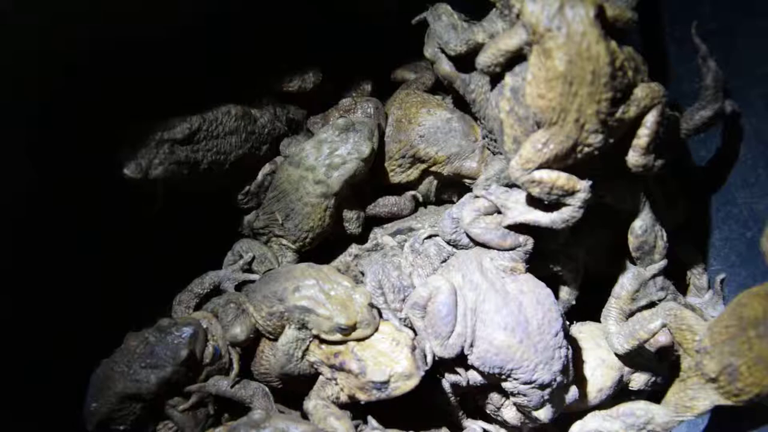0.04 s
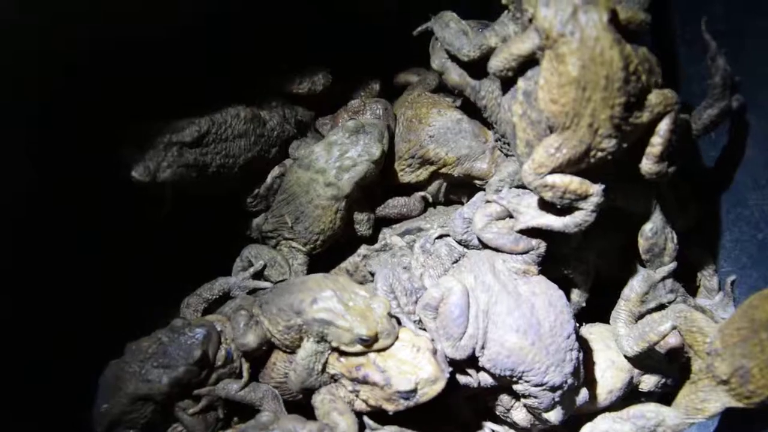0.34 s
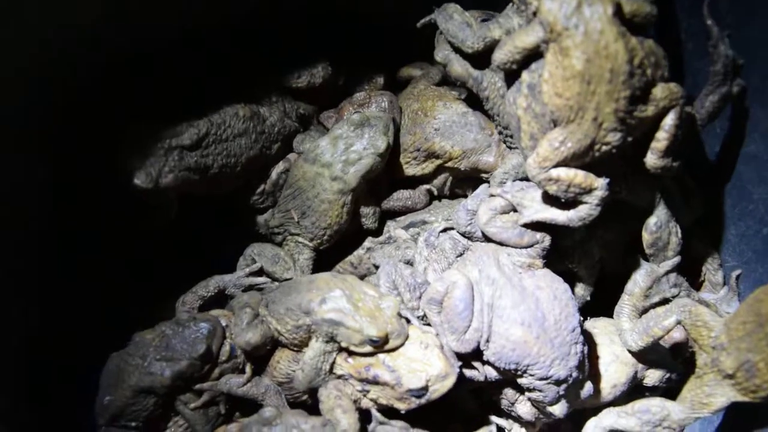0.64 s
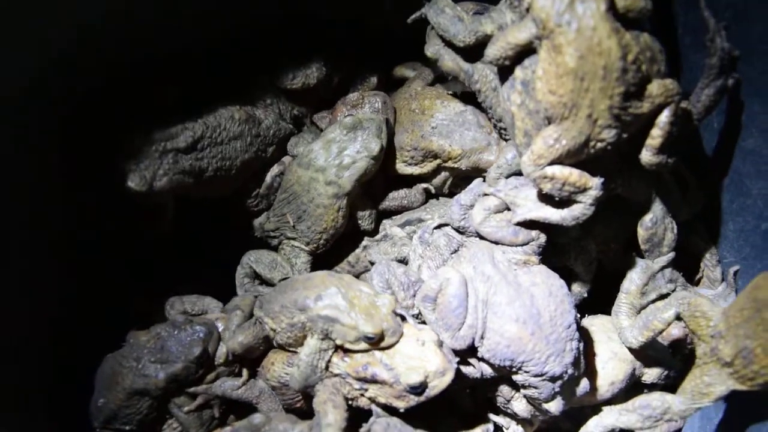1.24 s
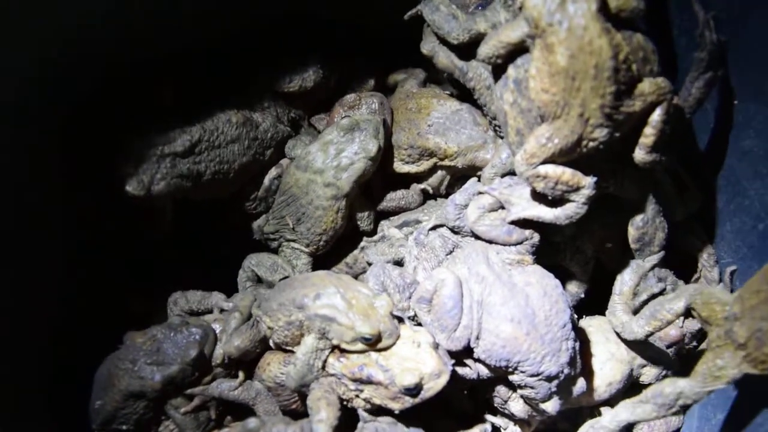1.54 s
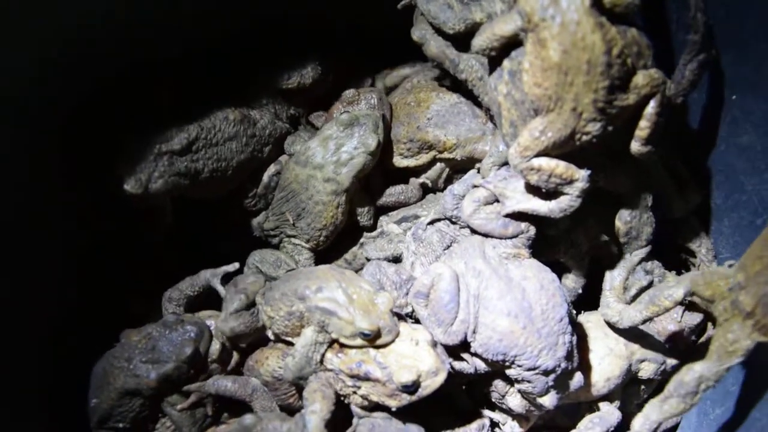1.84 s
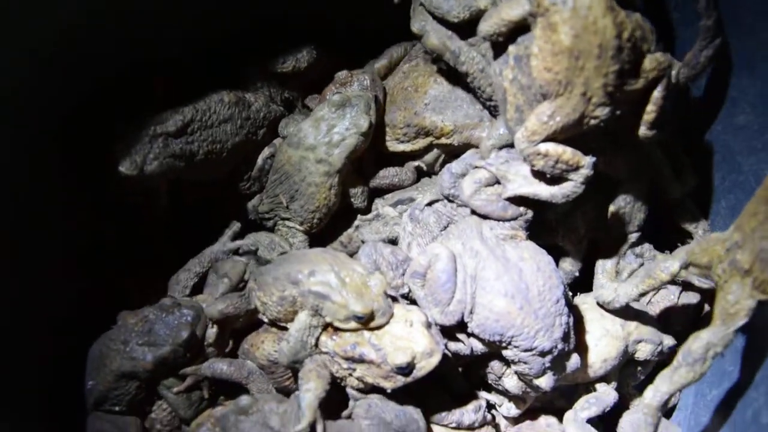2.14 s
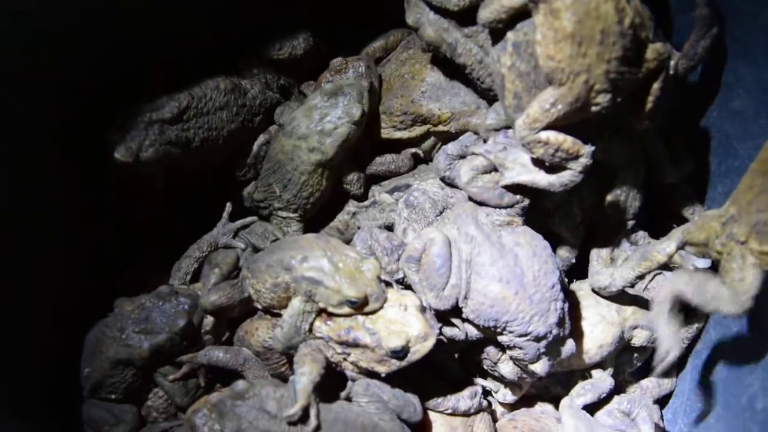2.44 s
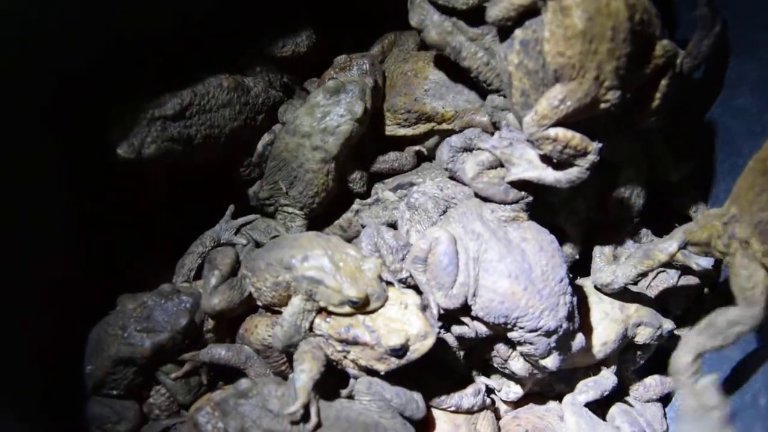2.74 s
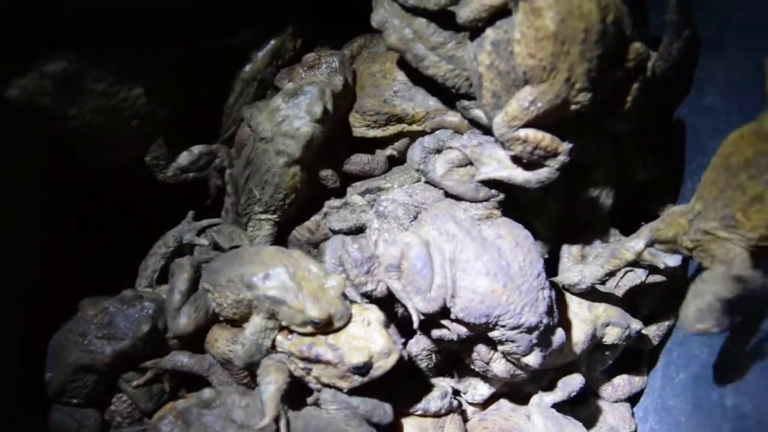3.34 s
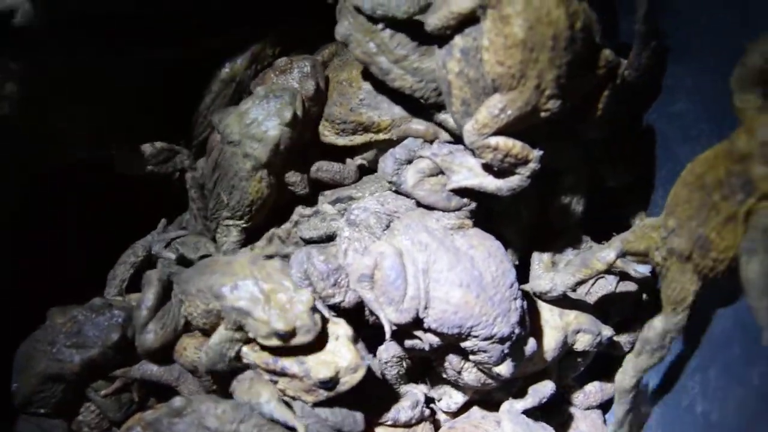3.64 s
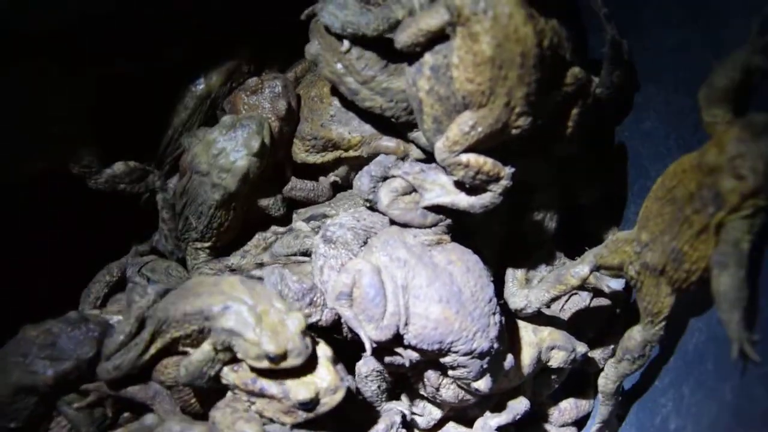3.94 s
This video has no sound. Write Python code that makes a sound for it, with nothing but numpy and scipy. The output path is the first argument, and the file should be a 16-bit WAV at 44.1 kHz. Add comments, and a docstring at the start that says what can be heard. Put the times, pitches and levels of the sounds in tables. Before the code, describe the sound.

Toads piled in a tub call close to the microphone in quick trills of short chirps, many running into clean, mostly falling whistles. A few dry rasps and faint squeaks come between, over soft night noise and a faint hum.

```python
"""Quick trills of short falling chirps, close by, running together into clean, mostly falling whistles:
the release calls of toads piled in a tub. Puffs of air through the larynx make the chirps; held open,
it whistles. Dry rasps, two thin squeals and a squeak come in between, and the tub adds a brief ring.
Behind them: soft night noise, a faint two-note hum and a thin insect hiss."""
import sys
import numpy as np
from scipy import signal
from scipy.fft import rfft, irfft
from scipy.io import wavfile

SR = 44100
rng = np.random.default_rng(int(sys.argv[2]) if len(sys.argv) > 2 else 0)


def log_audio(samples):
    """Write samples as a 16-bit WAV file to the path given in sys.argv[1]."""
    # one column per channel
    frames = np.atleast_2d(samples).T
    # limit to full scale, then quantise
    limited = np.clip(frames, -1, 1)
    pcm = np.round(limited * 32767).astype(np.int16)
    wavfile.write(sys.argv[1], SR, pcm)


N = 176400
TIME = np.arange(N) / SR
BIN_HZ = np.arange(N // 2 + 1) * SR / N

CHIRP_RISE_S, CHIRP_FALL_S, CHIRP_GLIDE_S, CHIRP_LEAD_S = 0.002082, 0.0045, 0.00287, 0.0003
PITCH_SAG, PITCH_SCATTER, PITCH_ROUGHNESS = 0.036, 0.012, 0.045
FIRST_PUFF_DB, PUFF_SCATTER_DB = -2, 0.1
# Colour change over a trill: shift_db at each of COLOUR_HZ
TRILL_SHIFT_DB = [-1, 3.5, 3.5, -5.5, -2, -3.5]
# Resonances rung by each chirp: centre_hz, width_hz, gain_db
CHIRP_RINGS = [(1754, 280, 4), (1980, 57, -11.5), (3600, 200, -5), (6100, 150, -10), (7400, 93, -15.5),
               (8950, 220, -6.5), (11900, 400, -8)]
# Trills: start_s, end_s, chirp_count, first_gap_ratio, last_gap_ratio (to the middle gap),
# first_db, middle_db, last_db, pitch_hz, chirp_fall_hz, overtone_db at each of COLOUR_HZ
TRILLS = [(0.1868, 0.2697, 9.0, 1.17, 1.19, -20, -21.5, -23.5, 1176, 339, -9, -24.5, -26, -45, -41, -45),
          (0.2656, 0.321, 5.0, 1.12, 0.83, -23, -21, -23.5, 1177, 150.0, -17, -23, -16, -32.5, -31, -37),
          (0.3561, 0.4352, 10.0, 1.23, 1.06, -13, -15, -16.5, 1144, 133, -13, -17.5, -18, -35.5, -39.5, -38),
          (0.8104, 0.9292, 15.0, 1.21, 1.22, -19.5, -16.5, -24, 1168, 203, -23.0, -24.5, -23.5, -26.5, -36.5, -30),
          (1.0448, 1.1299, 12.0, 0.96, 0.94, -15.5, -17, -24.5, 1150, 132, -12.0, -11.5, -16, -35, -33.5, -36),
          (1.22, 1.22, 1.0, 1.0, 1.0, -27.5, -24.0, -24.0, 1305, 302, -11, -18, -16, -32, -38, -44),
          (1.255, 1.2957, 4.0, 0.64, 0.77, -32, -21.5, -22, 1149, 120.0, -19, -25.5, -23, -34, -30, -33),
          (1.3317, 1.4174, 9.0, 1.23, 1.04, -26, -27.5, -34, 1158, 288, -12, -18, -14, -34, -38.0, -40.0),
          (1.444, 1.456, 2.0, 1.0, 1.0, -31, -33.0, -35.5, 1110, 298, -13, -16, -6, -29, -25, -50.0),
          (1.66, 1.8062, 20.0, 1.33, 1.055, -17.5, -16, -23.5, 1164, 197, -17, -17, -17.5, -31, -31, -26),
          (2.276, 2.2918, 2.0, 1.0, 1.0, -29.0, -25, -28.5, 1120, 150.0, -15.5, -17, -17, -32, -25, -21),
          (2.4243, 2.464, 6.0, 1.03, 1.14, -26.5, -26, -27.0, 1150, 149, -9, -21, -15, -28, -6.5, -14),
          (2.4475, 2.4871, 5.0, 1.05, 0.86, -17.5, -17.5, -14, 1136, 200.0, -21, -16.5, -32, -36, -32.0, -40.0),
          (2.5759, 2.6705, 12.0, 1.63, 1.27, -17.5, -15.5, -18.5, 1145.0, 134, -13.5, -17, -16.5, -37.5, -34, -42),
          (3.0975, 3.1428, 6.0, 1.17, 1.02, -32, -20.5, -24, 1178, 152, -11, -21.5, -10, -35.0, -39, -40.0),
          (3.1383, 3.2064, 9.0, 1.21, 1.0, -14, -15.5, -18, 1198, 250.0, -21.5, -18.5, -23.0, -35, -29.5, -35),
          (3.4077, 3.5241, 11.0, 1.28, 1.27, -20, -18.5, -23.5, 1038, 199, -15.5, -13, -22.5, -30, -34, -32),
          (3.7313, 3.7626, 4.0, 1.13, 0.84, -23.5, -22, -22, 1166, 281, -23.0, -14, -25, -29, -27.5, -30),
          (3.8707, 3.9454, 9.0, 1.11, 0.92, -15.5, -17.5, -20.5, 1210, 260.0, -29, -15.5, -21, -33, -30.5, -31)]


def trills():
    """Air puffs open the larynx about 100 times a second; each chirp falls in pitch and rings briefly."""
    out = np.zeros(N)
    t = np.arange(-256, 384) / SR  # chirp peak at t = 0
    from_peak = np.where(t < 0, t / CHIRP_RISE_S, t / CHIRP_FALL_S)
    envelope = np.cos(np.pi / 2 * np.clip(from_peak, -1, 1)) ** 2
    slide = np.exp(-np.maximum(t, -CHIRP_RISE_S) / CHIRP_GLIDE_S) - 1
    for start, end, count, first_gap, last_gap, first_db, mid_db, last_db, hz, fall_hz, *colour in TRILLS:
        count = round(count)
        onsets = np.r_[0, np.cumsum(arch(first_gap, 1, last_gap, count - 1))]
        levels_db = arch(first_db, mid_db, last_db, count)
        for progress, db in zip(onsets / max(onsets[-1], 1e-9), levels_db):
            sag = PITCH_SAG * (1 / 3 - progress ** 2)  # the air runs out
            jitter = PITCH_SCATTER * rng.normal() + PITCH_ROUGHNESS * drift(SR / 20, len(t))
            pitch_hz = (hz + fall_hz * slide) * (1 + sag + jitter)
            chirp = larynx(pitch_hz, envelope, colour, TRILL_SHIFT_DB, progress, overtone_power=0.87)
            db += FIRST_PUFF_DB * (progress == 0) - PUFF_SCATTER_DB * rng.normal()
            peak_s = start + (end - start) * progress - CHIRP_LEAD_S
            add(out, peak_s + t[0], from_db(db) * chirp)
    return out + sum(from_db(db) * resonance(out, hz, width) for hz, width, db in CHIRP_RINGS)


THROB_DEPTH, THROB_HZ, THROB_DECAY_S = 0.2, 120, 0.013
# Colour change over a whistle: shift_db at each of COLOUR_HZ
WHISTLE_SHIFT_DB = [9.5, 1.5, -3.5, -1, -8.5, -11.5]
# Whistles: start_s, end_s, start_hz, end_hz, start_db, end_db, overtone_db at each of COLOUR_HZ
WHISTLES = [(0.287, 0.341, 936, 866, -37, -45, -2.0, -21, -25.0, -35.0, -26, -40.0),
            (0.328, 0.396, 1071, 1007, -29.5, -37, -15.5, -27, -23, -33.0, -25, -28),
            (0.438, 0.509, 1129, 1048.0, -14, -23.5, -13.5, -23.5, -29, -46, -46.5, -49),
            (0.931, 0.961, 1020, 952, -28.5, -43, -12, -12, -30, -29, -27, -25),
            (1.002, 1.051, 971, 1189, -24, -14, -14.5, -14.5, -23, -34, -21.5, -34),
            (1.132, 1.191, 1120, 1060, -20.5, -29.5, -11.5, -15.5, -22, -42, -39.5, -48),
            (1.279, 1.351, 1030, 981, -26.5, -33, -25, -25, -28, -36, -34, -27),
            (1.704, 1.744, 1042, 1190, -22, -18, -37, -17.5, -33, -43, -34, -38),
            (1.808, 1.876, 1167, 1089, -26, -38.5, -7.5, -7, -13.5, -34.0, -33, -38),
            (2.304, 2.365, 998, 958, -33, -40.5, -22.0, -7.5, -9.5, -41, -23, -24),
            (2.468, 2.529, 1133, 1016, -27.5, -37.5, -25.0, -22, -23, -25.0, -8, -22),
            (2.491, 2.537, 1070, 991, -13.5, -22, -23.5, -27.5, -38, -47.0, -30, -45.0),
            (2.67, 2.738, 1140, 1082, -17, -26, -12, -18.5, -26.0, -43, -41, -46),
            (3.21, 3.264, 1107, 986, -13, -21, -34.5, -24, -28.0, -43.0, -35.5, -43),
            (3.517, 3.567, 979, 849, -24.5, -38.5, -12, -14, -22, -25, -31.5, -33.0),
            (3.766, 3.818, 1032, 988, -24, -35.5, -25, -0.5, -26, -30, -29.5, -36),
            (3.949, 4.005, 1087, 970, -14.5, -25, -32, -20, -29, -43, -37.0, -35)]


def whistles(attack_s=0.0045, release_s=0.013, bend_power=1.734, waver=0.0016):
    """The larynx stays open: the pulsing dies away into a clean tone whose glide levels off."""
    out = np.zeros(N)
    for start, end, start_hz, end_hz, start_db, end_db, *colour in WHISTLES:
        t = np.arange(int((end - start) * SR)) / SR
        progress = t / t[-1]
        glide_hz = end_hz + (start_hz - end_hz) * (1 - progress) ** bend_power
        pitch_hz = glide_hz * (1 + waver * drift(300, N // 10)[:len(t)])
        envelope = np.minimum(t / attack_s, 1) * np.minimum((t[-1] - t) / release_s, 1)
        throb = np.exp(-THROB_DEPTH * np.exp(-t / THROB_DECAY_S) * np.cos(2 * np.pi * THROB_HZ * t))
        tone = larynx(pitch_hz, envelope * throb, colour, WHISTLE_SHIFT_DB, progress)
        add(out, start, from_db(start_db + (end_db - start_db) * progress) * tone)
    return out


# Grid for each call's overtone colour: frequency_hz
COLOUR_HZ = [2200, 3400, 4400, 6800, 9500, 12500]
# Throat peaks and valleys, added to that colour: frequency_hz, gain_db
THROAT = [(1800, 4.5), (2250, -6.5), (2700, -6.5), (3500, -4.5), (4400, -11), (5100, -18.5), (6200, -8.5),
          (7600, -8.5), (9500, -6.5), (12000, -15), (15500, -27.5)]


def larynx(pitch_hz, envelope, colour_db, shift_db, progress, overtone_power=1, scatter_db=2):
    """A harmonic tone, its overtones weighted by the throat and by the call's shifting colour."""
    phase = 2 * np.pi * np.cumsum(pitch_hz) / SR
    out = envelope * np.sin(phase)
    for k, (scatter, offset) in enumerate(rng.standard_normal((14, 2)), 2):
        hz = k * pitch_hz
        db = at_hz(THROAT, hz) + np.interp(hz, COLOUR_HZ, colour_db) + scatter_db * scatter
        db += np.interp(hz, COLOUR_HZ, shift_db) * (progress - 0.5)
        out += from_db(db) * envelope ** overtone_power * np.sin(k * phase + np.pi * offset)
    return np.sqrt(2) * out


# Moving throat resonances: start_s, end_s, start_hz, end_hz, added_band_db
THROAT_GLIDES = [(0.808, 0.92, 7450, 8900, 7), (1.644, 1.726, 8850, 9250, 8.5),
                 (1.72, 1.809, 3800, 3570, 5.5), (1.727, 1.812, 6140, 6000, 4),
                 (1.73, 1.806, 1980, 2000, 4.5), (2.57, 2.667, 9500, 9100, 4),
                 (2.602, 2.672, 3600, 3560, -1.5), (3.398, 3.536, 8200, 8300, 7)]


def gliding_throat(calls, width_hz=230):
    """Each moving resonance lifts a narrow band of the call along its path."""
    out = calls.copy()
    pole = np.exp(-np.pi * width_hz / SR)
    for start, end, start_hz, end_hz, db in THROAT_GLIDES:
        part = calls[int(start * SR):int((end + 0.005) * SR)]
        carrier = np.exp(2j * np.pi * np.cumsum(np.linspace(start_hz, end_hz, len(part))) / SR)
        baseband = signal.lfilter([1 - pole], [1, -pole], part / carrier)
        band = 2 * (baseband * carrier).real
        add(out, start, from_db(db) * band * signal.windows.tukey(len(part), 0.1))
    return out


# Rasp resonances: frequency_hz, gain_db, t60_s
RASP_MODES = [(2337, -1, 0.0076), (4380, -10, 0.0076)]
# Rasps: start_s, end_s, pulse_count, level_db
RASPS = [(0.776, 0.799, 3, -30), (1.33, 1.419, 9, -24.5), (2.414, 2.423, 2, -27.5), (3.1, 3.1427, 6, -25)]


def rasps(attack_s=0.0012, detune=0.04):
    """Toads deeper in the pile: dry pulses, each ringing two high resonances."""
    out, t = np.zeros(N), TIME[:SR // 40]
    attack = np.minimum(t / attack_s, 1)
    for start, end, count, db in RASPS:
        for pulse_s in np.linspace(start, end, count):
            for hz, mode_db, t60_s in RASP_MODES:
                envelope = attack * from_db(db + mode_db + rng.normal() - 60 * t / t60_s)
                ring_hz = hz * (1 + detune * rng.normal())
                add(out, pulse_s - 0.001, envelope * np.sin(2 * np.pi * ring_hz * t))
    return out


# Squeak: start_s, level_db
SQUEAK = [(2.728, -35)]


def squeak(length_s=0.039, foot_hz=1418, top_hz=1870, roughness=0.13, overtone_db=-14):
    """A small rough squeak that rises and falls."""
    out, size = np.zeros(N), int(length_s * SR)
    for start, db in SQUEAK:
        pitch_hz = arch(foot_hz, top_hz, foot_hz, size) * (1 + roughness * drift(2000, N // 10)[:size])
        phase = 2 * np.pi * np.cumsum(pitch_hz) / SR
        tone = np.sin(phase) + from_db(overtone_db) * np.sin(2 * phase)
        add(out, start, from_db(db) * np.sqrt(np.hanning(size)) * tone)
    return out


# Squeals: start_s, end_s, start_hz, end_hz, level_db
SQUEALS = [(3.418, 3.471, 3540, 3330, -42), (3.462, 3.51, 2950, 2130, -41)]


def squeals(roughness=0.017):
    """Thin tones that slide down."""
    out = np.zeros(N)
    for start, end, start_hz, end_hz, db in SQUEALS:
        size = int((end - start) * SR)
        pitch_hz = np.linspace(start_hz, end_hz, size) * (1 + roughness * drift(1000, N // 10)[:size])
        tone = np.sin(2 * np.pi * np.cumsum(pitch_hz) / SR)
        add(out, start, from_db(db) * np.sqrt(np.hanning(size)) * tone)
    return out


# Tub wall reflections: delay_ms, gain_db
WALL_ECHOES = [(3.4, -19.5), (5.3, -25.5)]
# Scattered sound, opposite in each ear: frequency_hz, gain_db
SCATTER_SPECTRUM = [(1000, -27), (2200, -23.5), (4000, -9), (9000, -6), (14000, -6.5)]


def tub(calls, ring_t60_s=0.031, ring_db=-18.5, scatter_t60_s=0.02, pan_db=0.02):
    """The walls give two near reflections, a short diffuse ring and scatter that widens the treble."""
    t = TIME[:SR // 4]
    echoes = sum(from_db(db) * np.interp(TIME - ms / 1000, TIME, calls) for ms, db in WALL_ECHOES)
    tails = [rng.standard_normal(len(t)) * from_db(-60 * t / t60) for t60 in (ring_t60_s, scatter_t60_s)]
    ring, scatter = [signal.fftconvolve(calls, tail / np.linalg.norm(tail))[:N] for tail in tails]
    mid = calls + echoes + from_db(ring_db) * ring
    side = irfft(rfft(scatter) * from_db(at_hz(SCATTER_SPECTRUM, BIN_HZ)), N)
    return mid * from_db([[-pan_db], [pan_db]]) + side * [[1], [-1]]


# Night noise spectrum: frequency_hz, relative_db
NIGHT_SPECTRUM = [(18, -85), (30, -45), (178, -12.5), (352, -15.5), (391, -11), (457, -9), (508, -11),
                  (610, -7), (928, -8.5), (1000, -10.5), (1110, -7), (1300, -12), (1530, -12.5),
                  (1880, -16.5), (2090, -18), (2260, -23), (4590, -32.5), (5370, -34.5), (6620, -36),
                  (12100, -48.5), (15700, -57)]
# Left-right likeness: frequency_hz, correlation
NIGHT_CORRELATION = [(60, 1), (1000, .99), (2500, 0.86), (5000, 0.27), (12000, 0.27)]
# Swell of the noise below swell_top_hz: time_s, gain_db
NIGHT_SWELL = [(0.06, -4), (0.17, 1), (0.6, 0), (1.1, 4), (1.33, 9), (1.55, 3), (1.95, 0.5), (2.6, 2.5),
               (3.0, 0), (3.5, 3), (4.0, 1)]


def night(level_db=-44.5, low_cut_hz=25, swell_top_hz=1800):
    """Soft outdoor noise, wide in the treble; its centred lower part has one main swell."""
    shape = from_db(at_hz(NIGHT_SPECTRUM, BIN_HZ)) * BIN_HZ / np.hypot(BIN_HZ, low_cut_hz)
    mid, side = rfft(rng.standard_normal((2, N))) * shape
    correlation = np.clip(at_hz(NIGHT_CORRELATION, BIN_HZ), 0, 0.998)
    stereo = np.sqrt(1 + correlation) * mid + np.sqrt(1 - correlation) * side * [[1], [-1]]
    noise = unit_rms(irfft(stereo, N))
    low = irfft(rfft(noise) / (1 + (BIN_HZ / swell_top_hz) ** 4), N)
    swell = from_db(np.interp(TIME, *np.transpose(NIGHT_SWELL)))
    return from_db(level_db) * (noise - low + low * swell)


# Lower and upper hum notes: time_s, pitch_hz, level_db
HUM_LOW = [(0.1, 402.6, -61), (1.0, 396.5, -63.5), (1.5, 392, -45.5), (2.05, 392.9, -48.5),
           (2.6, 388.2, -52), (4.0, 380.2, -74.5)]
HUM_HIGH = [(0.1, 465.3, -55.5), (1.1, 463, -55.5), (1.55, 459.5, -41.5), (2.0, 457.4, -53),
            (2.4, 458.8, -62.5), (3.0, 454.7, -49.5), (4.0, 451, -70)]


def hum(note, waver_db=2, waver_hz=1.58):
    """A distant note that sinks slowly and wavers."""
    time_s, hz, db = np.transpose(note)
    pitch_hz = np.interp(TIME, time_s, hz) + waver_hz * drift(15, N)
    level_db = np.interp(TIME, time_s, db) + waver_db * drift(13, N)
    return np.sqrt(2) * from_db(level_db) * np.sin(2 * np.pi * np.cumsum(pitch_hz) / SR)


# Distant noise bands: centre_hz, width_hz, level_db
FAR_BANDS = [(1084.3, 70, -51), (5375, 410, -64.5), (15685, 8, -85.5)]


def far_bands():
    """Steady narrow noise from far off: a faint wash at toad pitch, insect hiss and a thin whine."""
    out = np.zeros(N)
    for hz, width_hz, db in FAR_BANDS:
        spectrum = rfft(rng.standard_normal(N)) / (1 + (2 * (BIN_HZ - hz) / width_hz) ** 2)
        out += from_db(db) * unit_rms(irfft(spectrum, N))
    return out


def from_db(db):
    return 10 ** (np.asarray(db) / 20)


def unit_rms(x):
    return x / np.sqrt(np.mean(x ** 2) + 1e-20)


def at_hz(points, hz):
    """Interpolate on a log-frequency axis."""
    point_hz, values = np.transpose(points)
    return np.interp(np.log(np.maximum(hz, 1)), np.log(point_hz), values)


def drift(rate_hz, size):
    """Random wander with a spread of about 1."""
    position = np.arange(size) * rate_hz / SR
    knots = rng.standard_normal(int(position[-1]) + 2)
    return np.interp(position, np.arange(len(knots)), knots)


def arch(first, middle, last, count):
    """A parabola through three values."""
    u = np.linspace(0, 1, count)
    return first + (last - first) * u + (middle - (first + last) / 2) * 4 * u * (1 - u)


def add(out, start_s, sound):
    i = max(int(start_s * SR), 0)
    out[i:i + len(sound)] += sound[:max(N - i, 0)]


def resonance(x, hz, width_hz):
    """Two-pole band-pass, unity peak gain."""
    radius = np.exp(-np.pi * width_hz / SR)
    numerator = np.array([1, 0, -1]) * (1 - radius ** 2) / 2
    denominator = [1, -2 * radius * np.cos(2 * np.pi * hz / SR), radius ** 2]
    return signal.lfilter(numerator, denominator, x + 1e-18)


def scene(low_cut_hz=730):
    """The toads in their tub over the night background."""
    background = night() + far_bands() + hum(HUM_LOW) + hum(HUM_HIGH)
    calls = gliding_throat(trills() + whistles()) + squeak() + rasps() + squeals()
    low_cut = signal.butter(2, low_cut_hz, "high", fs=SR, output="sos")  # small bodies radiate no bass
    return tub(signal.sosfilt(low_cut, calls)) + background


def record(dry, silence_s=0.063, fade_s=0.16, cutoff_hz=15900):
    """The sound fades in; the top treble is cut steeply."""
    fade_in = np.clip((TIME - silence_s) / fade_s, 0, 1)
    low_pass = signal.ellip(12, 0.1, 80, cutoff_hz, fs=SR, output="sos")
    return signal.sosfilt(low_pass, dry * fade_in)


dry = scene()
out = record(dry)
log_audio(out)
```